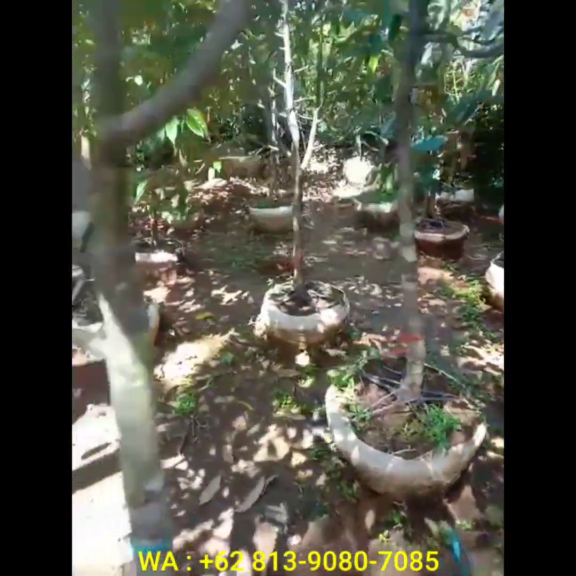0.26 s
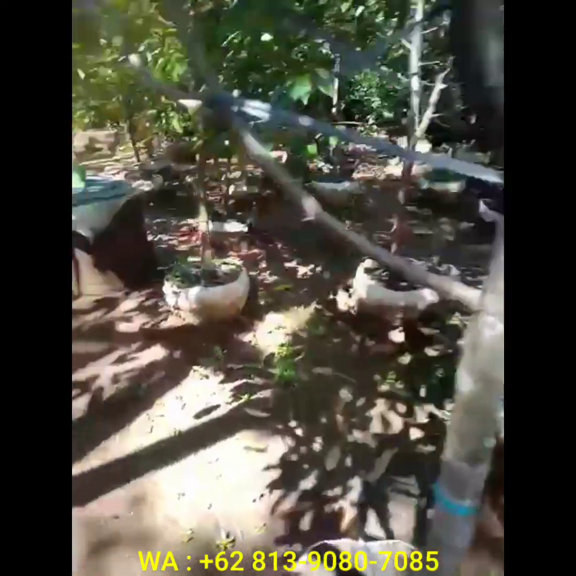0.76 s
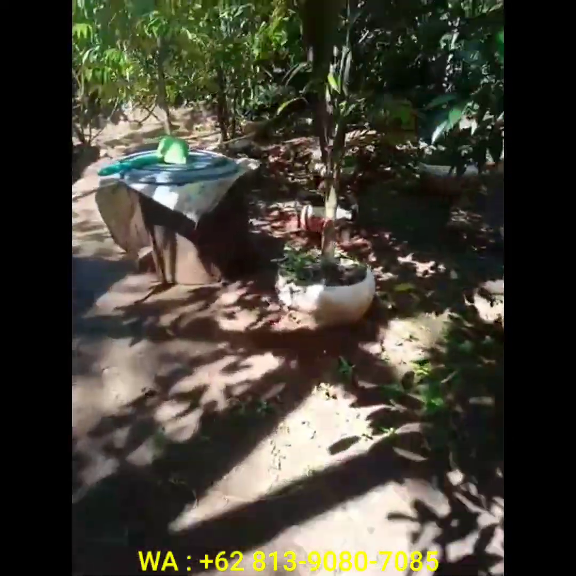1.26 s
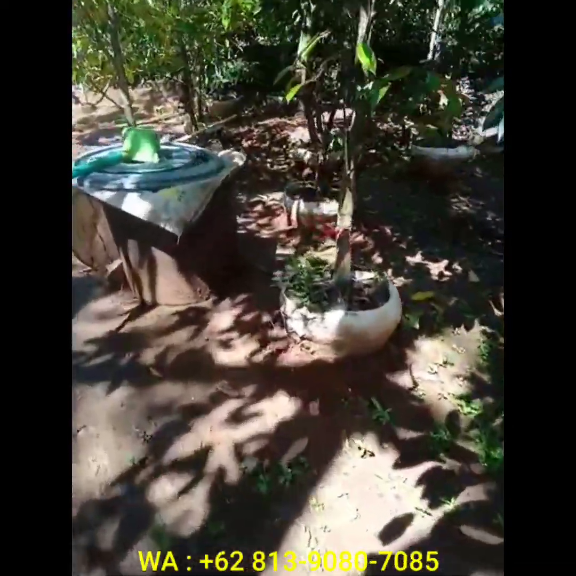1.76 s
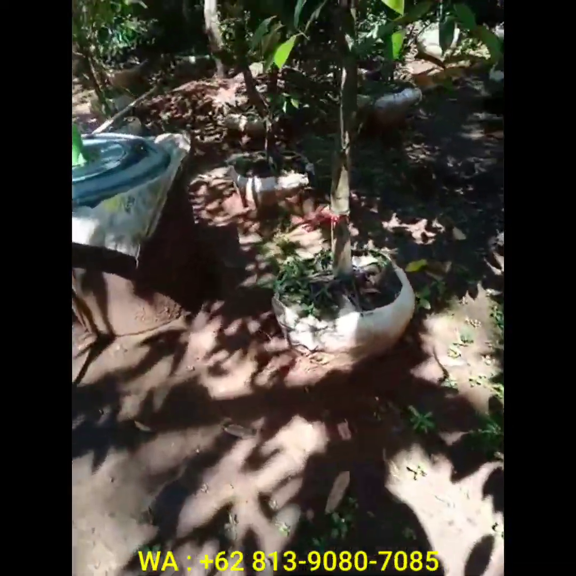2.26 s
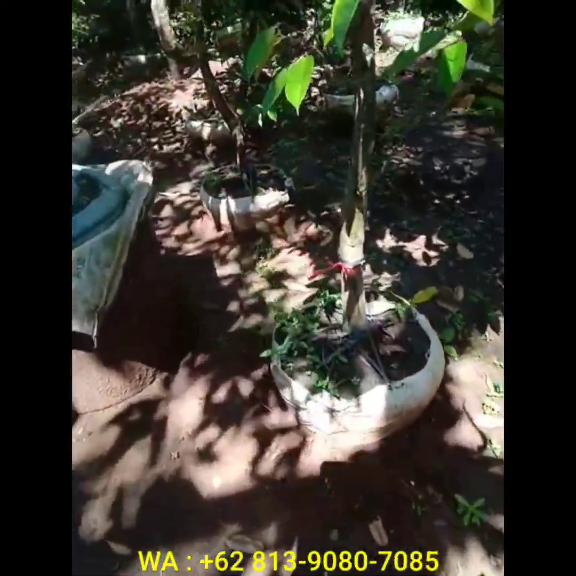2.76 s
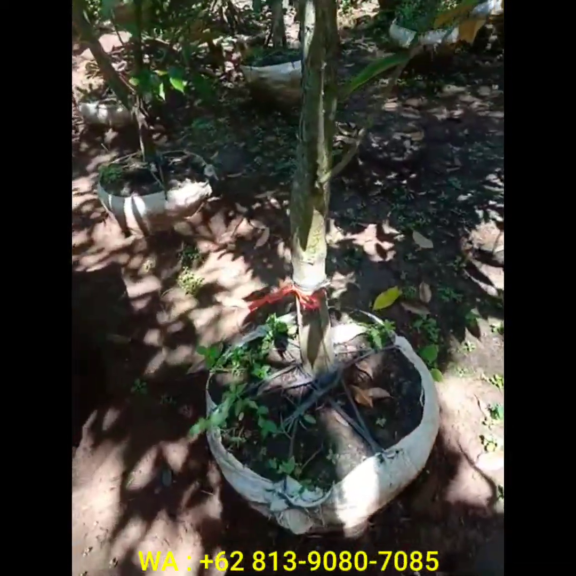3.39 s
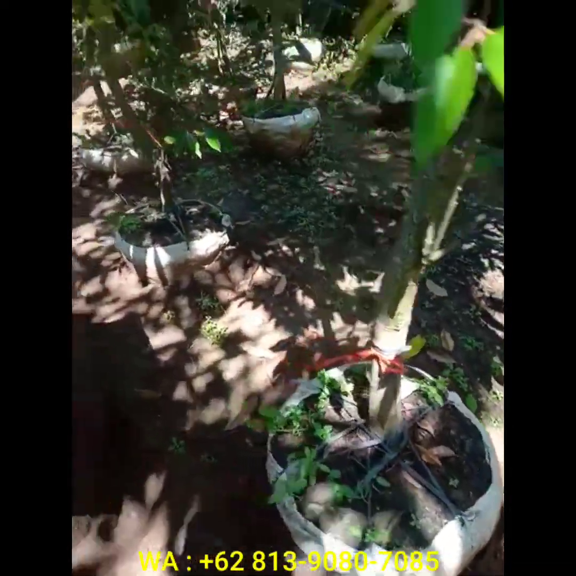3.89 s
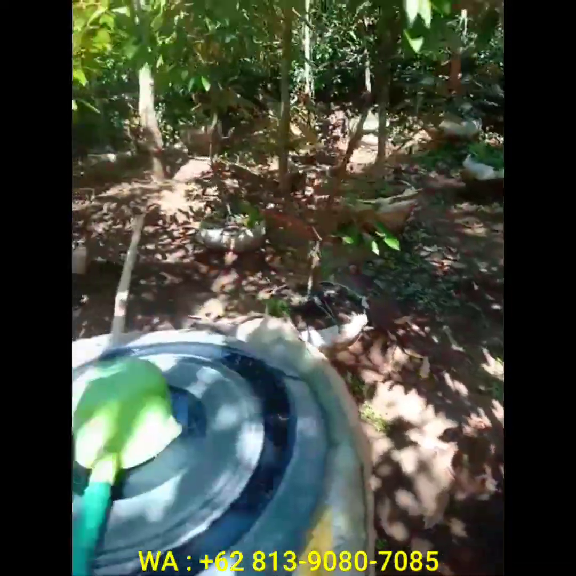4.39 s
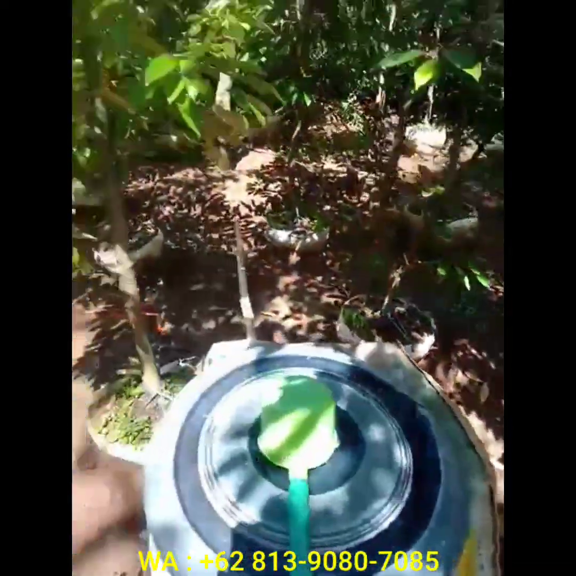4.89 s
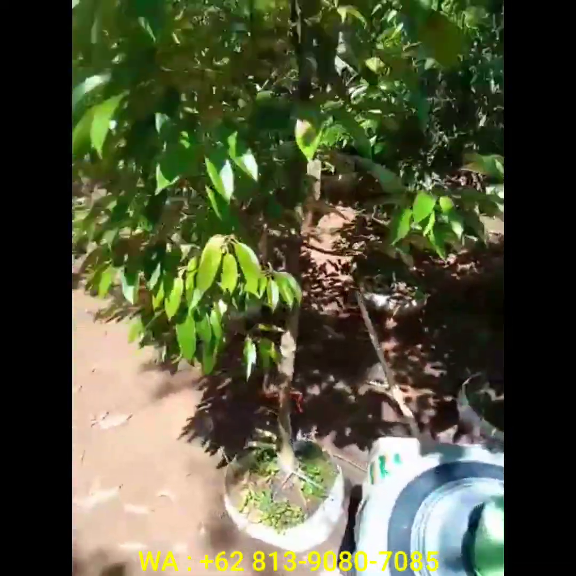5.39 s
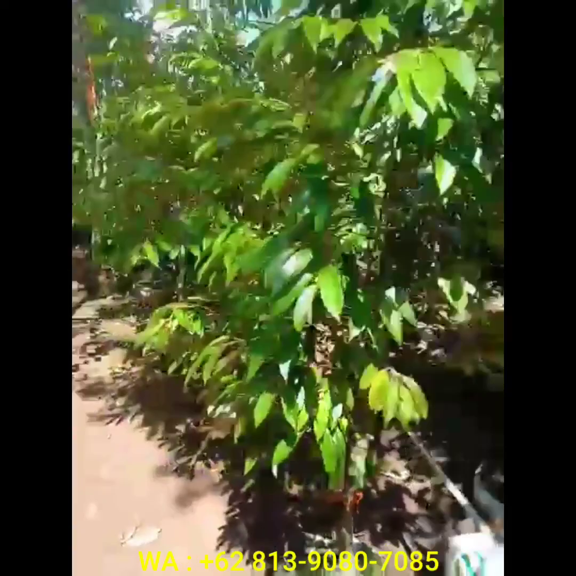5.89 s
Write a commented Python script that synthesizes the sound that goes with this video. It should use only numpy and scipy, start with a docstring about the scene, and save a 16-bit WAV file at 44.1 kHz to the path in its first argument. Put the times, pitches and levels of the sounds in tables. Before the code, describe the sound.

Outdoors, someone walks slowly over fallen leaves, each step a crisp, uneven crunch. Twigs crack brightly and foliage drags right past the microphone, most strongly in the first two seconds. Afterwards the walk is quieter: soft crackles, an occasional snap, clothing swishes and fingers briefly rubbing the handheld phone. The sound is close, narrow and a little nasal, over a faint low rumble.

```python
"""Slow walk between potted trees

Soles crush fallen leaves on dry earth in clumps of tiny fractures, and twigs snap with a bright crack
over a woody knock. Stiff leaves drag past close by, clothing swishes, and skin rubs the phone the
walker holds. A soft outdoor rumble lies underneath. The phone's microphone adds a nasal ring,
and the sound is almost mono."""
import sys
import numpy as np
from scipy import signal
from scipy.fft import rfft, irfft, next_fast_len
from scipy.io import wavfile
from scipy.ndimage import uniform_filter1d

SR = 44100
rng = np.random.default_rng(int(sys.argv[2]) if len(sys.argv) > 2 else 0)


def put_to_file(sound):
    """Save the sound as 16-bit audio at rate SR, in the file named by the first command-line argument."""
    columns = np.atleast_2d(sound).T  # one column per channel
    safe = np.clip(columns, -1, 1)
    whole_steps = np.round(safe * 32767)
    wavfile.write(sys.argv[1], SR, whole_steps.astype(np.int16))


N = 270897
TIME = np.arange(N) / SR


# A sole presses or shifts on leaves and grit.
# Each row: start in seconds, hold in seconds, body and crispness in dB before the trims in rustle().
FOOT_PRESSES = [(0.0, 0.061, -40, -45), (0.097, 0.1, -51, -53.5), (0.40, .04, -50, -50),
                (0.465, .085, -42, -38.5), (0.668, 0.13, -53, -40), (0.814, 0.14, -47, -38),
                (1.054, 0.058, -44.5, -39), (1.143, 0.036, -33, -30.5), (1.199, 0.078, -33, -27.5),
                (1.326, 0.041, -36.5, -37.5), (1.417, 0.074, -54, -44.5), (1.588, 0.015, -54, -38),
                (1.68, 0.021, -54, -50.5), (1.83, 0.093, -41.5, -40), (1.971, 0.15, -38, -40),
                (2.167, 0.042, -40, -38), (2.43, .09, -52.5, -44), (2.545, 0.053, -56, -39.5),
                (2.704, 0.047, -43, -44.5), (2.754, 0.095, -51, -41.5), (3.038, 0.014, -39, -46),
                (3.428, .03, -44, -48), (3.817, 0.023, -52, -68), (3.992, 0.11, -43.5, -50.5),
                (4.365, 0.016, -44, -51), (4.48, 0.022, -68, -46.5), (4.985, .10, -55, -46),
                (5.005, .035, -41.5, -41), (5.15, 0.033, -59, -50.5), (5.378, 0.054, -43.5, -50.5),
                (5.689, 0.037, -46, -40.5), (5.826, 0.086, -56, -51)]

def footwork(press_s=0.023, lift_s=0.027, settle_s=0.14, settle_db=-11):
    """Envelopes of body and crispness: weight comes on and lifts, then leaves creak as they spring back."""
    body_power, crisp_power = from_db([-59.5, -62.5]) ** 2   # leaves stirring between steps
    for start, hold, body_db, crisp_db in FOOT_PRESSES:
        press = swell(start, hold, press_s, lift_s)
        settle = from_db(settle_db) * swell(start, hold, press_s, settle_s)
        power = np.maximum(press, settle) ** 2
        body_power += power * from_db(body_db) ** 2
        crisp_power += power * from_db(crisp_db) ** 2
    return np.sqrt(body_power), np.sqrt(crisp_power)


# The midrange body and the crisp top of crushed leaves. Each row: frequency in Hz, gain in dB.
BODY_EQ = [(50, -58), (120, -16), (330, -12), (620, -7), (1000, -8), (1700, -0.5), (2400, -2), (3300, -4),
           (5000, -17)]
CRISP_EQ = [(1000, -36), (2000, -8.5), (3000, -3), (4300, -3), (5800, 4), (7400, 1.5), (9500, -8),
            (16000, -8)]

def rustle(clump_db=1.86, body_trim_db=-3.0, crisp_trim_db=-0.77):
    """Litter fractures in clumps under the soles, and the leaves underfoot keep changing the colour."""
    body_gain, crisp_gain = footwork()
    clumps = from_db(clump_db * drift(69))
    body = rms_one(colour(grains(per_s=1300, spread_db=2.14, hiss=0.47) * clumps, BODY_EQ))
    # each fracture rings one leaf for a few cycles
    leaves = sum(resonate(grains(per_s=260, spread_db=3.2, hiss=0.45), hz, hz / 6) / np.sqrt(hz)
                 for hz in np.geomspace(2000, 12000, 12))
    crisp = rms_one(colour(leaves * clumps, CRISP_EQ)) + from_db(-10) * ribs()
    litter = body * body_gain * from_db(body_trim_db) + crisp * crisp_gain * from_db(crisp_trim_db)
    return shifting(litter, depth_db=3, rate=8)


def ribs(per_s=45, spread_db=1.5, t60=0.018):
    """Small leaf ribs give way at random, each a sudden burst that dies at once; rms 1."""
    breaks = rng.random(N) < per_s / SR
    sizes = from_db(spread_db * np.minimum(rng.exponential(1, N), 4))
    bursts = signal.lfilter([1], [1, -from_db(-60 / (t60 * SR))], breaks * sizes + 1e-18)
    return rms_one(colour(bursts * white(), CRISP_EQ))


# Twigs, stalks and ribs breaking. Each row: start in seconds, knock in dB before its trim, crack in dB.
TWIG_BREAKS = [(0.0298, -26, -36.5), (0.5557, -26.5, -37), (0.6394, -69, -39), (0.7503, -53, -31.5),
               (0.8075, -65, -26), (0.8898, -40, -26), (0.9312, -56, -29.5), (1.0528, -50, -36.5),
               (1.098, -58, -26.5), (1.1133, -25, -30), (1.1523, -24, -32), (1.19, -22.5, -13.5),
               (1.2049, -45, -20), (1.213, -58, -20.5), (1.2368, -59, -21), (1.2458, -46, -21),
               (1.276, -39, -24), (1.327, -30, -34), (1.3483, -41, -26), (1.3654, -38, -26),
               (1.3732, -47, -28.5), (1.9357, -38, -37), (1.973, -36, -32), (2.2101, -28.5, -33.5),
               (2.739, -30, -42), (2.7644, -60, -34.5), (3.0356, -29.5, -53), (3.0507, -35.5, -60),
               (3.6336, -38.5, -38), (3.998, -45, -62), (4.359, -48, -45), (5.2585, -33.5, -44),
               (5.684, -57, -47), (5.714, -40.5, -48), (5.955, -38.5, -65)]
# The woody ring of a stalk. Each row: frequency in Hz, relative level in dB, seconds to fall 60 dB.
STALK_MODES = [(620, -55.5, 0.004), (930, -8.5, 0.012), (1146, -1, 0.036), (1496, 2.5, 0.012),
               (1770, 6, 0.0092), (2170, 3, 0.012)]

def snaps(crack_hz=5080, width_hz=4200, db_per_octave=95, knock_trim_db=-3.0):
    """One break, then splinters and faint scatter off ground and pots: a bright crack over a knock."""
    out, t = np.zeros(N), TIME[:SR // 8]
    attack = slice(SR // 200)   # the first 5 ms set the level
    splinters = 0.17 * from_db(-60 * t / 0.013)
    scatter = 0.013 * from_db(-60 * t / 0.12)
    for start, knock_db, crack_db in TWIG_BREAKS:
        # the more knock over crack, the thicker the stalk and the lower it cracks
        hz = crack_hz * 2 ** ((crack_db - knock_db) / db_per_octave)
        push = rng.standard_normal(len(t)) * (splinters + scatter)
        push[0] = 1   # the break itself
        crack = resonate(resonate(push, hz, width_hz), hz, 2 * width_hz)
        crack = butterworth(crack, 1.38 * hz)
        # the stalk starts from rest, so its modes rise as sines; no two stalks are tuned alike
        wood = 0
        for mode_hz, db, t60 in STALK_MODES:
            tuned_hz = mode_hz * np.exp(rng.normal(0, 0.067))
            wood += from_db(db - 60 * t / t60) * np.sin(2 * np.pi * tuned_hz * t)
        push[1:] *= 0.22   # splinters barely move the heavy stalk
        knock = signal.fftconvolve(push, wood)[:len(t)]
        knock = butterworth(knock, 720, "high", order=3)   # a thin stalk radiates no bass
        add(out, start, from_db(knock_db + knock_trim_db) * knock / knock[attack].std())
        add(out, start, from_db(crack_db) * crack / crack[attack].std())
    return out


# A stiff leaf drags and lets go. Each row: start, hold, rise and fall in seconds,
# hiss level in dB, then the low layer and the top layer in dB against the hiss.
LEAF_DRAGS = [(1.2988, 0.01, .0004, 0.0069, -20.5, -16, -4), (1.864, 0.041, 0.0046, 0.019, -21.5, -7, 0),
              (4.4699, 0.011, .0002, 0.0026, -29.5, -17, -7.5), (5.682, 0.0046, .001, 0.0062, -35, -14, -9),
              (3.023, 0.0044, 0.00073, 0.0036, -37, -8, 1), (4.36, .012, .001, 0.0071, -51.5, 4, -16),
              (5.352, 0.0036, .0005, 0.0068, -45.5, -1, -20), (5.265, 0.02, .002, 0.013, -49, 5, -17),
              (3.803, 0.024, .002, 0.015, -62, 18, -24)]
# The tone of those three layers. Each row: frequency in Hz, gain in dB.
DRAG_HISS_EQ = [(1000, -28), (2000, -3), (3000, -2.5), (5500, 1.5), (7400, 1), (9500, -3.5), (13000, -27),
                (16000, -50)]
DRAG_LOW_EQ = [(60, -42), (200, -11), (300, -2), (420, -12.5), (620, 1), (820, 3), (1000, -4.5),
               (1300, -1.5), (1600, -3.5), (2600, -4.5), (4500, -13), (9000, -24), (16000, -36)]
DRAG_TOP_EQ = [(200, -18), (600, -1.5), (1500, -43), (3000, -4.5), (6000, 2), (8500, 11.5), (12000, 7.5),
               (16000, 3)]

def scrapes(lead_s=0.04):
    """Dense stick and slip while a leaf edge is dragged past."""
    out, t = np.zeros(N), TIME[:SR // 4] - lead_s
    hiss = rms_one(colour(grains(per_s=5000, spread_db=2.9, hiss=0.37), DRAG_HISS_EQ))
    top = rms_one(colour(grains(per_s=4600, spread_db=2.0, hiss=0.57), DRAG_TOP_EQ))
    low = rms_one(colour(grains(per_s=2700, spread_db=2.5, hiss=0.22), DRAG_LOW_EQ))
    for start, hold, rise, fall, db, low_db, top_db in LEAF_DRAGS:
        contact = np.exp(np.minimum(t / rise, 0) - np.maximum((t - hold) / fall, 0))
        part = slice(int(start * SR), int(start * SR) + len(t))
        friction = hiss[part] + from_db(top_db) * top[part] + from_db(low_db) * low[part]
        add(out, start - lead_s, from_db(db) * contact * friction)
    return out


# Foliage right beside the phone. Each row: start in seconds, hold in seconds, level in dB.
FOLIAGE_BRUSHES = [(1.148, 0.056, -24.5), (1.22, 0.096, -29), (1.88, 0.058, -29.5), (2.005, 0.022, -40),
                   (2.75, 0.066, -41.5)]

def brushes():
    """Leaves brush by with a sparse crackle, so near that it keeps its top octave."""
    bright_eq = [(2000, -27), (5000, -7.5), (8000, 1.5), (10000, 2), (16000, -7.5)]
    crackle = rms_one(colour(grains(per_s=900, spread_db=4.8, hiss=0.53), bright_eq))
    return crackle * touches(FOLIAGE_BRUSHES, rise_s=0.0045, fall_s=0.011)


# Leaf tip flicks. Each row: start in seconds, level in dB.
LEAF_FLICKS = [(1.1353, -19), (3.168, -33)]

def ticks():
    """A leaf tip hits the phone with a tiny, very high click."""
    ring = rms_one(resonate(white(), hz=8300, width_hz=1300))
    return ring * touches([(start, 0, db) for start, db in LEAF_FLICKS], rise_s=1 / SR, fall_s=0.0034)


# Clothing swishes. Each row: start and end in seconds, first and last pitch in Hz, level in dB.
CLOTH_SLIDES = [(0.0, 0.402, 2480, 2164, -48), (0.044, 0.284, 3950, 3910, -50),
                (1.633, 1.84, 2760, 2470, -57), (2.218, 2.343, 2475, 2253, -49.5),
                (2.53, 2.697, 4650, 4060, -46.5), (3.039, 3.18, 3100, 2900, -57),
                (3.262, 3.38, 4360, 4900, -55.5), (3.674, 3.93, 5550, 5250, -45),
                (3.781, 4.168, 5320, 5030, -46.5), (3.794, 3.903, 3910, 3360, -49.5),
                (3.979, 4.286, 2580, 2107, -52), (4.12, 4.27, 3400, 3270, -50),
                (4.361, 4.551, 4310, 5800, -48.5), (4.926, 5.022, 4950, 4470, -46),
                (5.34, 5.519, 3540, 3340, -47), (5.371, 5.503, 1945, 1800, -52.5),
                (5.817, 5.97, 2120, 1342, -53.5), (5.95, 6.016, 4020, 4000, -54.5),
                (6.06, 6.18, 4320, 4450, -53)]

def swishes(width_hz=450, waver_db=1.6):
    """Cloth slides on cloth, its pitch following its speed; the fabric catches and lets go."""
    bands = glides([(*slide, width_hz, db) for *slide, db in CLOTH_SLIDES])
    return bands * rms_one(from_db(waver_db * drift(25)))


# Dull rubs on the phone. Each row: start in seconds, hold in seconds, level in dB.
CASE_RUBS = [(3.615, 0.1, -41), (3.815, 0.069, -39)]
# The ring of its case. Each row: frequency in Hz, width of the narrower filter in Hz, gain in dB.
CASE_MODES = [(180.5, 68, 2.5), (300, 89, -14), (521, 38, 4), (646, 50, -11), (1040, 150, -20)]

def rubs():
    """Skin slips on the case and shakes its low resonances."""
    slips = grains(per_s=500, spread_db=0.63, hiss=0.54)
    case = sum(from_db(db) * resonate(resonate(slips, hz, width), hz, 4 * width)
               for hz, width, db in CASE_MODES)
    return rms_one(case) * touches(CASE_RUBS, rise_s=0.033, fall_s=0.047)


# Soft thuds. Each row: centre in seconds, level in dB.
WALK_THUDS = [(0.411, -49), (0.583, -48.5), (1.344, -50.5), (2.568, -47.5), (2.818, -45), (3.34, -48.5),
              (4.735, -43.5), (5.224, -48.5), (5.328, -50)]

def thuds():
    """Jolts of the walk carry up to the phone, each a few low cycles."""
    return sum(from_db(db) * low_bump(centre, half_s=0.016, hz=134.5) for centre, db in WALK_THUDS)


def puff():
    """Air buffets the microphone once."""
    return from_db(-39.5) * low_bump(centre_s=5.939, half_s=0.027, hz=60)


# The tone of the outdoor bed. Each row: frequency in Hz, gain in dB.
AIR_EQ = [(20, -9), (45, -25), (70, -7), (125, 3.5), (200, -5), (350, -10.5), (900, -13.5), (2000, -19.5),
          (6000, -16), (9000, -15.5), (16000, -22)]

def outdoors(air_db=-51, lumpy_db=3.5, hum_hz=299.6, hum_db=-63.5):
    """Lumpy far rumble, a hiss that wavers in colour and a faint hum."""
    air = rms_one(colour(white(), AIR_EQ))
    rumble = butterworth(air, 220)
    air = shifting(air, depth_db=3.4, rate=5)
    air += rumble * (from_db(lumpy_db * drift(11)) - 1)
    hum = np.sqrt(2) * np.sin(2 * np.pi * hum_hz * TIME + 0.83 * drift(4.3))
    return from_db(air_db) * air + from_db(hum_db) * hum


# Distant hums. Each row: start and end in seconds, first and last pitch in Hz, width in Hz, level in dB.
DISTANT_HUMS = [(1.72, 1.78, 610, 560, 100, -49.5), (3.96, 4.06, 742, 705, 36, -53),
                (3.86, 4.08, 1540, 1640, 110, -52.5), (4.30, 4.64, 870, 780, 180, -53),
                (3.8, 4.90, 1500, 1370, 43, -64), (5.52, 5.78, 212, 226, 27, -54.5),
                (4.8, 6.14, 330, 330, 150, -62.5)]

def far_hums():
    """Faint narrow hums come and go in the distance."""
    return glides(DISTANT_HUMS)


def reflected(x, delays_s=(0.0011, 0.0019, 0.0031, 0.0047), gain=0.21, sway=0.039):
    """Echoes off pots, trunks and the walker hollow out the sound; the notches slide as the phone sways."""
    out = x
    for delay_s in delays_s:
        late = delay_s * (1 + sway * drift(0.92))
        out = out + gain * np.interp(TIME - late, TIME, x)
    return out / np.sqrt(1 + len(delays_s) * gain ** 2)


# Ambience that differs between left and right. Each row: frequency in Hz, gain in dB.
DIFFUSE_EQ = [(30, -4), (70, -7), (150, -5), (300, -2.5), (1200, -3), (3000, -2.5), (6000, -11),
              (9000, -14.5), (15000, -11)]

def stereo_side(mid, smear_db=-30, smear_t60=0.12, diffuse_db=-65):
    """A little stereo width from steady ambience and a faint, dull smear of the centre sound."""
    tail = rng.standard_normal(SR // 4) * from_db(-60 * TIME[:SR // 4] / smear_t60)
    smear = signal.fftconvolve(mid, tail / np.linalg.norm(tail))[:N]
    diffuse = rms_one(colour(white(), DIFFUSE_EQ))
    return from_db(smear_db) * butterworth(smear, 2500) + from_db(diffuse_db) * diffuse


def grains(per_s, spread_db, hiss):
    """Tiny fractures of uneven size over a share of smooth friction noise; rms 1."""
    clicks = np.zeros(N)
    at = np.flatnonzero(rng.random(N) < per_s / SR)
    sizes = rng.laplace(0, 1, N)[at]
    clicks[at] = np.sign(sizes) * from_db(spread_db * np.minimum(np.abs(sizes), 4))
    return rms_one(rms_one(clicks) + hiss * white())


def glides(rows):
    """Narrow bands of noise that swell, slide in pitch and fade."""
    out = np.zeros(N)
    for start, end, from_hz, to_hz, width_hz, db in rows:
        size = int((end - start) * SR)
        waver = butterworth(rng.standard_normal((2, 2 * SR)), width_hz / 2)[:, -size:]
        phase = 2 * np.pi * np.cumsum(np.linspace(from_hz, to_hz, size)) / SR
        band = rms_one(waver[0] * np.cos(phase) + waver[1] * np.sin(phase))
        arch = np.sin(np.linspace(0, np.pi, size))
        add(out, start, from_db(db) * arch * band)
    return out


def low_bump(centre_s, half_s, hz):
    """A few low cycles under a bell-shaped swell."""
    bell = np.exp(-np.minimum(((TIME - centre_s) / half_s) ** 2, 20))
    return np.sqrt(2) * bell * np.sin(2 * np.pi * (hz * TIME + rng.random()))


def swell(start, hold, rise_s, fall_s):
    """Envelope that reaches 1 at start, holds and releases; rise and fall are time constants."""
    attack = np.minimum((TIME - start) / rise_s, 0)
    release = np.maximum((TIME - start - hold) / fall_s, 0)
    return np.exp(np.maximum(attack - release, -20))


def touches(rows, rise_s, fall_s):
    """Envelope of a series of contacts; their powers add."""
    return np.sqrt(sum((from_db(db) * swell(start, hold, rise_s, fall_s)) ** 2 for start, hold, db in rows))


def shifting(x, depth_db, rate, bands=24):
    """Narrow bands between 400 Hz and 8 kHz swell and sink on their own."""
    size, out = next_fast_len(N, real=True), 0
    spectrum = rfft(x, size)
    hz = np.arange(len(spectrum)) * SR / size
    place = np.interp(np.sqrt(hz), np.sqrt([400, 8000]), [0, bands - 1])
    for k in range(bands):
        gain = rms_one(from_db(depth_db * np.clip(drift(rate), -2, 2))) if 0 < k < bands - 1 else 1
        band = np.clip(1.5 - 2 * np.abs(place - k), 0, 1)
        out += gain * irfft(spectrum * band, size)[:N]
    return out


def drift(rate):
    """Slow random wander: noise low-passed twice at rate Hz; rms about 1."""
    pole = np.exp(-32 * np.pi * rate / SR)   # runs at a sixteenth of the sample rate
    noise = rng.standard_normal(N // 16 + 2002)
    slow = signal.lfilter([1], [1, -2 * pole, pole * pole], noise)[2000:]
    return uniform_filter1d(np.repeat(rms_one(slow), 16), 16)[:N]


def colour(x, eq, size=8192):
    """Minimum-phase equaliser through points of frequency in Hz and gain in dB."""
    hz, db = np.transpose(eq)
    bins = np.maximum(np.arange(size // 2 + 1) * SR / size, 1)
    gain = from_db(np.interp(np.log(bins), np.log(hz), db))
    cepstrum = irfft(np.log(gain))
    cepstrum[1:size // 2] *= 2
    cepstrum[size // 2 + 1:] = 0
    return signal.fftconvolve(x, irfft(np.exp(rfft(cepstrum))))[:len(x)]


def resonate(x, hz, width_hz):
    """One resonance with gain 1 at its peak."""
    r = np.exp(-np.pi * width_hz / SR)
    feedback = [1, -2 * r * np.cos(2 * np.pi * hz / SR), r * r]
    return signal.lfilter(np.array([1, 0, -1]) * (1 - r * r) / 2, feedback, x)


def butterworth(x, hz, kind="low", order=2):
    """Smooth low-pass or high-pass."""
    return signal.sosfilt(signal.butter(order, hz, kind, fs=SR, output="sos"), x)


def add(out, start, sound):
    """Mixes a sound into out, start seconds in."""
    at = max(round(start * SR), 0)
    out[at:at + len(sound)] += sound[:N - at]


def white():
    """White noise for the whole scene."""
    return rng.standard_normal(N)


def from_db(db):
    """Decibels to gain."""
    return 10 ** (np.asarray(db) / 20)


def rms_one(x):
    """Scales to rms 1."""
    return x / np.sqrt(np.mean(x ** 2) + 1e-20)


def scene():
    """The walker and the outdoor bed sit in the centre, with a trace of width around them."""
    near = reflected(rustle() + swishes()) + brushes() + ticks() + snaps() + scrapes()
    handling = rubs() + thuds() + puff()
    mid = near + handling + reflected(outdoors()) + far_hums()
    side = stereo_side(mid)
    return np.array([mid + side, mid - side])


# The nasal tone of the phone's microphone. Each row: frequency in Hz, gain in dB.
MICROPHONE_EQ = [(30, -8.5), (70, 4.5), (1020, -1.5), (1160, 3), (1245, 12), (1340, 4.5), (1520, -0.5),
                 (3600, -0.5), (6100, -1), (6650, -5.5), (7400, -2), (8600, -15.5), (13700, -14),
                 (15000, -1)]

def record(dry, cutoff_hz=15550):
    """The microphone port rings near 1.2 kHz, and the response climbs back near 15 kHz after a dip above 8 kHz;
    the top is cut steeply."""
    heard = np.array([colour(channel, MICROPHONE_EQ) for channel in dry])
    return signal.sosfilt(signal.ellip(10, 0.3, 80, cutoff_hz, fs=SR, output="sos"), heard)


dry = scene()
out = record(dry)
put_to_file(out)
```